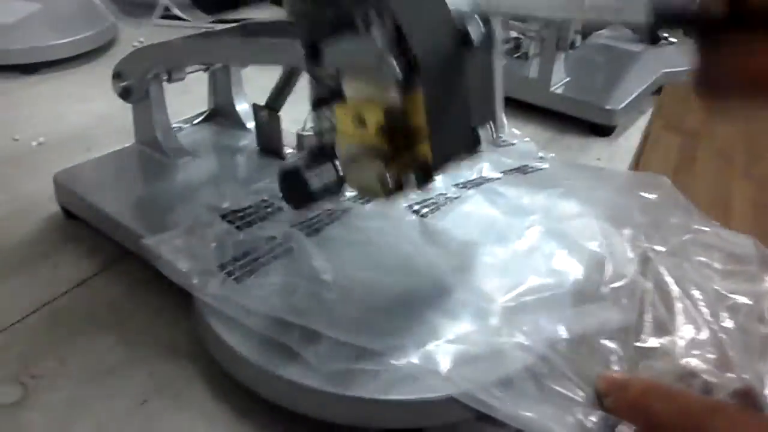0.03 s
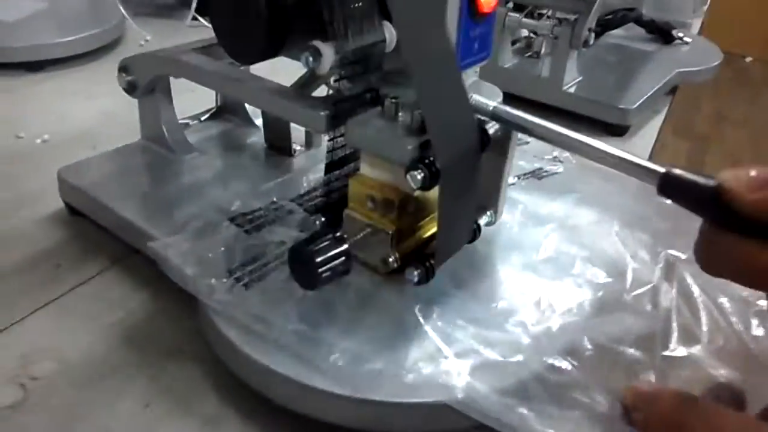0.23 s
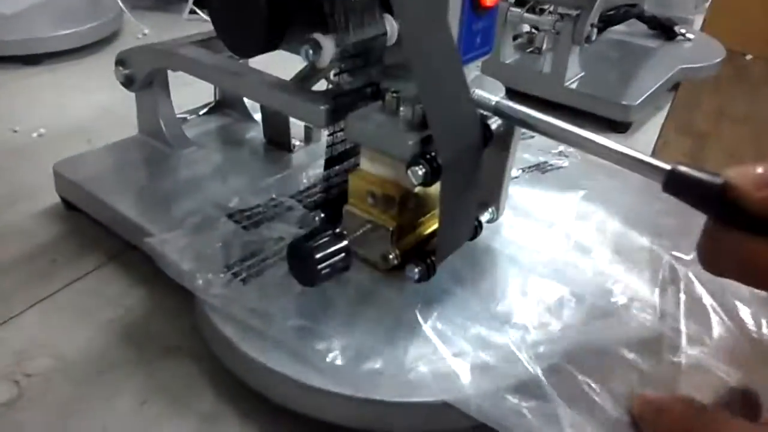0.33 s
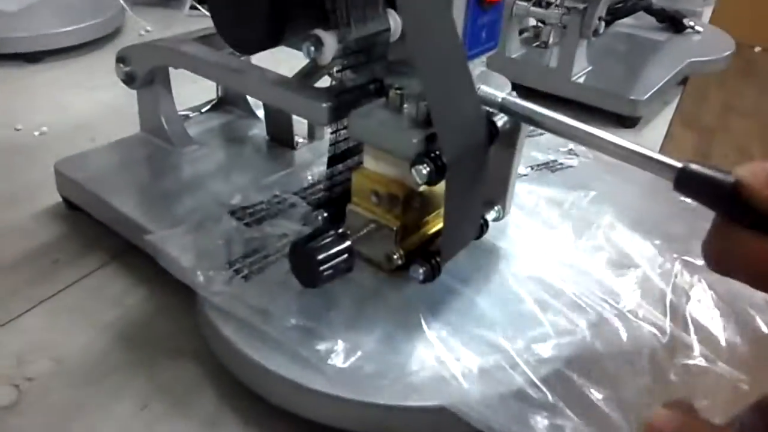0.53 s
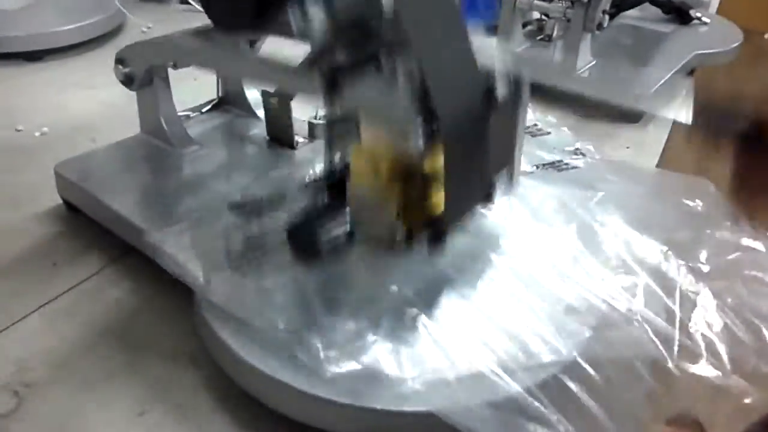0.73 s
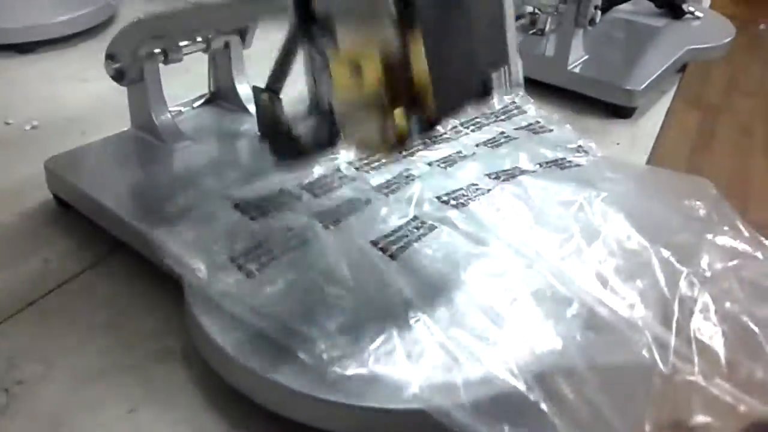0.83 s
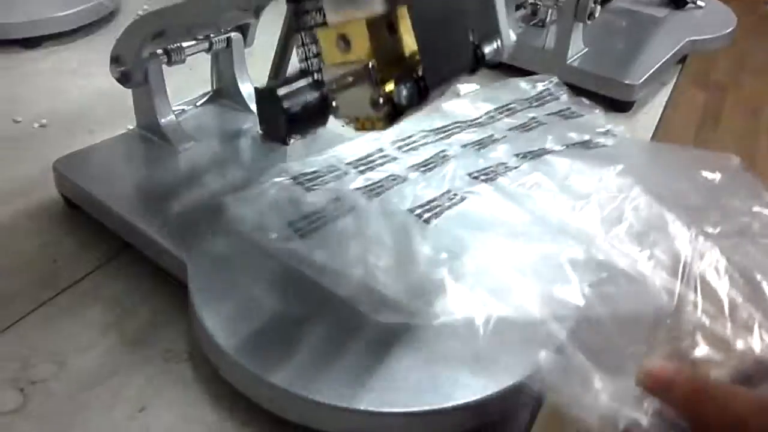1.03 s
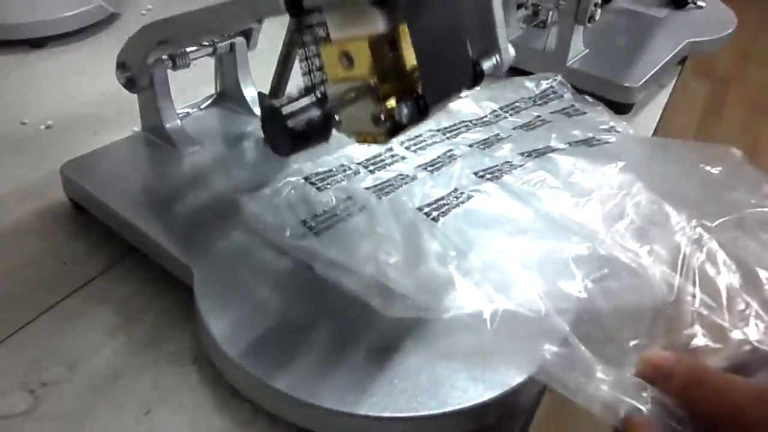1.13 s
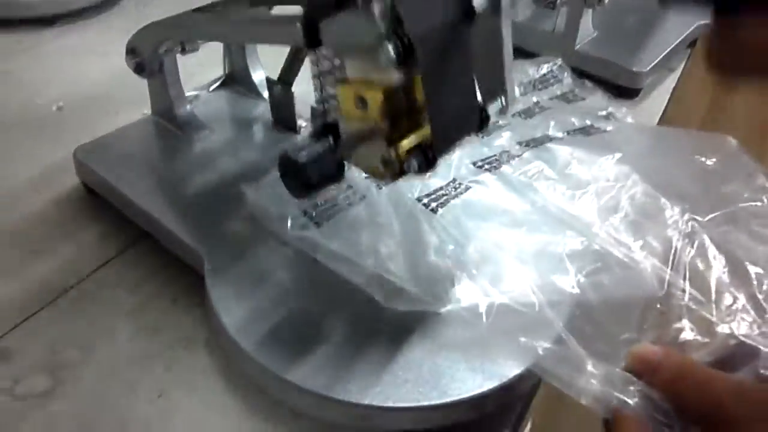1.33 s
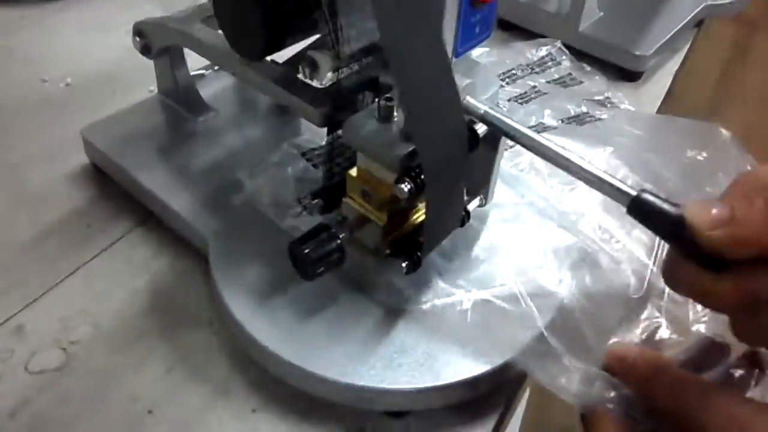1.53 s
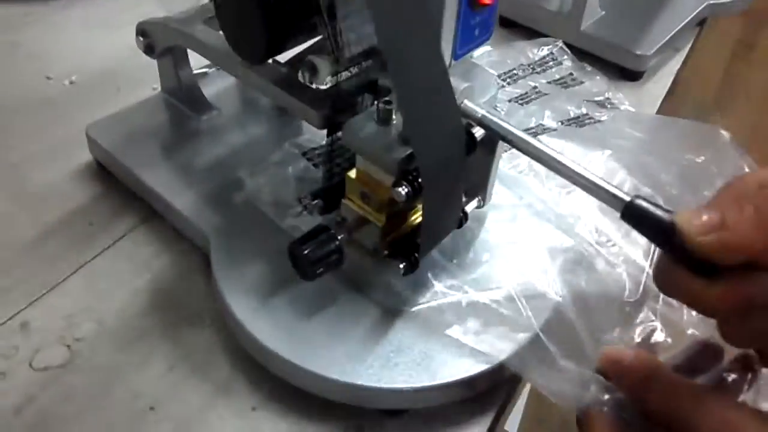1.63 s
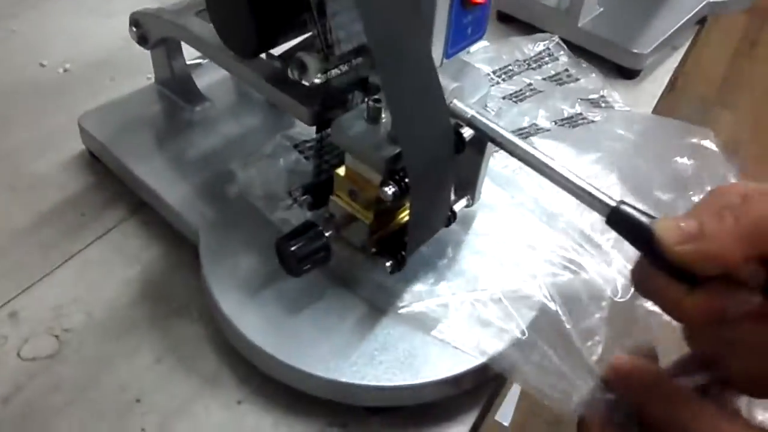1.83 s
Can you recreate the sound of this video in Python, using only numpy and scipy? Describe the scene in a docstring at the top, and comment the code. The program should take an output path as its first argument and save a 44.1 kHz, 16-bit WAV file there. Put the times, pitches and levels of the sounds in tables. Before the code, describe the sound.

A hand-lever stamping machine clunks onto a plastic bag at about 0.2 seconds, its metal head bouncing and shaking the bench. The bag crackles as it is pulled along, most at 0.8 seconds, when the arm bumps its stop and squeaks faintly. The ribbon feed clicks sharply at 1.2 seconds. A second clunk comes at 1.6, followed by light crinkles. Everything is close, with short workshop echo and faint hum.

```python
"""A hand-lever coding machine stamps a plastic bag twice, close by on a workshop bench.
Its metal head clunks onto a plate, bounces and shakes the bench. Between the strokes the bag
is pulled along and crackles as its creases flip, the rising arm bumps its stop and squeaks
faintly, and the ribbon feed clicks over. The room adds a short echo and a faint hum."""
import sys
import numpy as np
from scipy import signal
from scipy.io import wavfile

SR = 44100
rng = np.random.default_rng(int(sys.argv[2]) if len(sys.argv) > 2 else 0)


def materialize(psi):
    """Save the field psi as 16-bit PCM at rate SR to the path in sys.argv[1].

    A 1-D psi becomes a single channel; in a 2-D psi each row is a channel.
    """
    bounded = np.clip(np.atleast_2d(psi).T, -1, 1)
    quanta = np.round(bounded * 32767).astype(np.int16)
    wavfile.write(sys.argv[1], SR, quanta)


N = 83790
T = np.arange(N) / SR

# Steady workshop noise: band_hz, level_db
BACKGROUND = [(25, -72), (55, -73), (95, -71), (170, -72), (260, -74.5), (450, -73), (1000, -75.5),
              (2400, -74.5), (5000, -81.5), (10000, -78.5), (15000, -81.5)]
# Hum of mains power and a motor: pitch_hz, level_db
HUM = [(98, -68.5), (252, -71.5)]
# How hard the bag is being moved: time_s, level_db
BAG_MOVEMENT = [(0, -27.5), (.15, -25.5), (.205, -2.5), (.26, -28), (.40, -22.5), (.52, -29.5),
                (.79, -25.5), (.832, -3), (.865, -16.5), (.95, -21), (1.08, -21), (1.17, -31), (1.53, -37),
                (1.595, -8), (1.66, -32), (1.9, -26)]
# Hiss of sliding plastic: band_hz, level_db
BAG_HISS = [(300, -62), (900, -59), (2300, -58.5), (3500, -59), (5200, -49), (9500, -63.5), (15000, -75)]
# Single creases snapping: start_s, level_db, brightness_hz
CREASE_SNAPS = [(.1775, 2, 2930), (0.2013, -5, 7000), (0.3335, -9, 15900), (0.3783, -9, 9700),
                (0.399, -8.5, 13000), (0.4044, -16, 7000), (0.437, -11, 13600), (.4590, -23, 9190),
                (0.491, -9.5, 7000), (.5497, -13.5, 15000), (0.6121, -13, 9050), (0.6433, -15, 13800),
                (0.6978, -4.5, 3970), (0.761, -3.5, 10240), (0.7649, -7, 10000), (0.7691, 1.5, 11300),
                (0.7997, -22, 12900), (0.817, -8, 7860), (0.8221, 2, 6500), (0.8288, 1, 5500),
                (0.832, 3.5, 9300), (1.7194, -17, 8900), (1.8099, -4.5, 16000), (1.8300, -11.5, 10010),
                (1.8718, -19, 12900), (1.8972, -5, 14300)]
# Brief ring of the plastic: band_hz, level_db, fade_s (always the time to fall by 60 dB)
BAG_RING = [(1000, -57.5, 0.004), (2350, -44, 0.0096), (3820, -58, 0.003), (5940, -42, 0.0086),
            (9720, -46, 0.0033), (15450, -24, .0035)]
# Hits and bounces of the head: start_s, metal_db, brightness_hz, thump_db, plate_db
HEAD_HITS = [(0.2122, -7.5, 6000, -2.5, -1), (0.2135, -3, 8900, -10, -23), (0.2155, -0.5, 7900, -26, -13),
             (0.2305, -6, 9200, -11.5, -32), (0.2824, -10.5, 1760, -9.5, -18.5),
             (0.3072, -30, 495, -28, -48), (0.342, -26, 500, -25, -50), (0.3780, -37, 900, -49, -43),
             (0.536, -22.5, 610, -26.5, -44), (0.565, -30, 407, -34, -41), (1.6002, -28, 1540, -11, -13),
             (1.6022, -8, 6840, -5.5, -29), (1.61, -10.5, 2270, -14, -15.5), (1.6219, -19, 7500, -9.5, -20),
             (1.6294, -14.5, 9300, -18, -25), (1.7020, -24, 500, -27, -33)]
# Tones of the cast metal frame: pitch_hz, level_db, fade_s
FRAME_TONES = [(416.8, -36, 0.08), (542.9, -33.5, 0.19), (636.3, -48, 0.14), (674.6, -20, 0.033),
               (910, -36, 0.16), (950, -37, 0.092), (1476, -34, 0.063), (2250, -68.5, 0.037),
               (2800, -39, 0.1), (4890, -39.5, 0.077), (6223, -30, 0.041)]
# The many small rings of head, bolts and arm: band_hz, level_db, fade_s
CLATTER = [(268, -32, 0.36), (490, -32.5, 0.049), (855, -33, 0.015), (1180, -33, 0.057), (2100, -28, 0.075),
           (3450, -32.5, 0.064), (5700, -25, 0.034), (8300, -32, 0.013), (12000, -38, 0.012),
           (14800, -2.5, 0.06)]
# Tones of the bench top and base plate: pitch_hz, level_db, fade_s
BENCH_TONES = [(49.4, -38, 0.302), (72.13, -24.5, 0.3), (93.26, -30.5, 0.37), (122.3, -27, 0.29),
               (152.2, -31, 0.22), (189.7, -34, 0.27), (241, -25, 0.14), (254, -25, 0.12), (296, -27, 0.31),
               (355, -32, 0.19)]
# The whole machine rocking on its feet: pitch_hz, level_db, fade_s
FEET_TONES = [(67, -18, 0.083), (110, -17, 0.051)]
# Hollow tones of the stamping plate: pitch_hz, level_db, fade_s
PLATE_TONES = [(886, -16.5, 0.052), (973, -24, 0.063), (756, -19, 0.036), (1676, -25.5, 0.056)]
# The rising arm meeting its soft stop: start_s, level_db, brightness_hz
ARM_BUMPS = [(.8365, 1.5, 910), (.8485, 0, 700)]
# Low tones of the arm: pitch_hz, level_db, fade_s
ARM_TONES = [(160, -56.5, 0.08), (247.5, -47, 0.11)]
# Squeaks of the arm's pivot: start_s, length_s, level_db
SQUEAKS = [(0.864, 0.056, -55.5), (.921, 0.028, -49.5)]
# Clicks of the ribbon feed: start_s, ring_db, brightness_hz, crack_db, housing_db
FEED_CLICKS = [(1.1922, -19, 2500, -49, -20), (1.1959, -10, 3900, -39, -2), (1.201, 4, 2840, -21, -9),
               (1.2088, -18, 4000, -28, -1.5), (1.2266, -4, 10700, 0.5, 4)]
# Tones of the feed's small catch: pitch_hz, level_db, fade_s
CATCH_TONES = [(2110, -59, 0.036), (2292, -33.5, 0.037), (2435, -43, 0.04), (3500, -34.5, 0.02),
               (3855, -47.5, 0.1), (5170, -28.5, 0.012), (6320, -36.5, 0.028), (8200, -33.5, 0.016),
               (10940, -46, 0.027), (11400, -37, 0.023), (13770, -49, .02)]
# Sharp crack of the catch: band_hz, level_db, fade_s
CATCH_CRACK = [(990, -61, .03), (3060, -56, 0.028), (6480, -36, 0.011), (9500, -61, 0.01),
               (13230, -30.5, 0.02), (16000, -43, 0.018)]
# Loose parts of the feed: band_hz, level_db, fade_s
FEED_RATTLE = [(1540, -59, 0.12), (2930, -41, 0.083), (5500, -53, 0.055), (9000, -57, 0.074),
               (12000, -49, 0.15)]
# Tones of the housing around the feed: pitch_hz, level_db, fade_s
HOUSING_TONES = [(179, -56, 0.081), (255, -53, 0.15), (440, -61.5, 0.35), (958, -39.5, 0.063),
                 (1420, -58, 0.057)]
# Echo of the workshop: band_hz, level_db, fade_s
ROOM_ECHO = [(61, -14.5, 0.96), (130, -25.5, .5), (258, -29, 0.76), (570, -10, 0.27), (955, -10.5, 0.27),
             (2550, -12, 0.34), (6100, -21.5, 0.14), (15000, -14.5, 0.13)]

TOP_HZ = 15900  # upper limit of the sound, also the brightness of a hard tap
BAND_EDGES_HZ = 22 * 2 ** (np.arange(20) / 2)


def from_db(db):
    """Turn decibels into a number to multiply by."""
    return 10 ** (np.asarray(db) / 20)


def at_hz(table, hz):
    """Read a table's values at one frequency, blending between rows."""
    row_hz, *columns = np.transpose(table)
    return [np.interp(np.log(hz), np.log(row_hz), column) for column in columns]


def fade_out(fade_s, size=N):
    """A curve that falls by 60 dB every fade_s seconds."""
    return np.exp(-np.log(1000) * T[:size] / max(fade_s, 1e-3))


def noise_bands(size=N):
    """Give equally strong half-octave bands of noise, each with its middle frequency."""
    for low, high in zip(BAND_EDGES_HZ, BAND_EDGES_HZ[1:]):
        band_filter = signal.butter(2, [low, high], "band", fs=SR, output="sos")
        band = signal.sosfilt(band_filter, rng.standard_normal(size + SR // 10))[-size:]
        yield np.sqrt(low * high), band / band.std()


def steady_noise(table):
    """Noise with its own level in each band."""
    return sum(from_db(at_hz(table, hz)[0]) * band for hz, band in noise_bands())


def noisy_ring(table, size=6000):
    """Many overlapping tones blur into noise; each band dies away at its own speed."""
    ring = np.zeros(N)
    for hz, band in noise_bands(size):
        db, fade_s = at_hz(table, hz)
        fade = fade_out(fade_s, size)
        bass_cut = min(1, hz / table[0][0]) ** 2
        even_energy = np.sqrt(np.sum(fade ** 2) / np.sum((band * fade) ** 2))
        ring[:size] += from_db(db) * bass_cut * band * fade * even_energy
    return ring


def clear_ring(tones, wave=np.sin):
    """A struck object rings with fading tones; np.cos suits a sudden push on a broad surface."""
    return sum(from_db(db) * wave(2 * np.pi * hz * T) * fade_out(fade_s) * (-1) ** (k // 2)
               for k, (hz, db, fade_s) in enumerate(tones))


def taps(rows):
    """Short pushes from (start_s, level_db, brightness_hz); a softer tap has less treble."""
    force = np.zeros(N)
    for start_s, db, hz in rows:
        soften = signal.butter(2, min(hz, .45 * SR), fs=SR)
        pulse = signal.lfilter(*soften, signal.unit_impulse(SR // 20))
        start = min(int(start_s * SR), N - 1)
        force[start:start + len(pulse)] += from_db(db) * pulse[:N - start]
    return force


def excite(force, ring):
    """Every push in the force starts its own copy of the ring."""
    return signal.fftconvolve(force, ring)[:N]


def workshop_background():
    """Mains power and a motor hum faintly over steady noise."""
    hum = sum(from_db(db) * np.sin(2 * np.pi * (hz * T + rng.random())) for hz, db in HUM)
    return hum + steady_noise(BACKGROUND)


def bag(crinkles_per_s=1300, crinkle_db=-16.5, spread_db=3):
    """Tiny crinkles and a sliding hiss grow as the bag is moved harder; single creases snap on top."""
    movement = from_db(np.interp(T, *np.transpose(BAG_MOVEMENT)))
    sizes = from_db(crinkle_db + spread_db * np.minimum(rng.exponential(1, N), 4))
    signs = rng.choice([-1, 1], N)
    crinkles = sizes * signs * movement * (rng.random(N) < crinkles_per_s / SR)
    snaps = sum(crease_snap(*row) for row in CREASE_SNAPS)
    return snaps + excite(crinkles, noisy_ring(BAG_RING)) + movement * steady_noise(BAG_HISS)


def crease_snap(start_s, db, brightness_hz):
    """One crease flips and rings the plastic; a higher snap stands for a smaller crease."""
    lowest_hz = np.clip(0.38 * brightness_hz, 100, .4 * SR)
    bass_cut = signal.butter(2, lowest_hz, "high", fs=SR)
    force = signal.lfilter(*bass_cut, taps([(start_s, db, brightness_hz)]) + 1e-18)
    return excite(force, noisy_ring(BAG_RING))


def stamp(spread_db=3, thump_hz=556):
    """Each hit of the head rings the frame and small parts a little differently, and thumps the bench."""
    metal = 0
    for start_s, db, brightness_hz, _, _ in HEAD_HITS:
        tones = [(hz, level + spread_db * rng.normal(), fade_s) for hz, level, fade_s in FRAME_TONES]
        ring = clear_ring(tones) + noisy_ring(CLATTER)
        metal = metal + excite(taps([(start_s, db, brightness_hz)]), ring)
    push = taps([(start_s, db, thump_hz) for start_s, _, _, db, _ in HEAD_HITS])
    bench = clear_ring(BENCH_TONES, np.cos) + clear_ring(FEET_TONES, np.cos)
    return metal + excite(push, bench)


def plate_knock():
    """The head's stamping face knocks on the plate, which rings hollowly."""
    force = taps([(start_s, db, TOP_HZ) for start_s, _, _, _, db in HEAD_HITS])
    return excite(force, clear_ring(PLATE_TONES))


def arm_bump():
    """The arm bumps dully at the top of its swing."""
    return excite(taps(ARM_BUMPS), clear_ring(ARM_TONES))


def pivot_squeak(pitch_hz=3960, width_hz=30, rise_s=0.0023):
    """Rubbing at the pivot makes the arm sing on one slightly wavering note."""
    narrow_filter = signal.iirpeak(pitch_hz, pitch_hz / width_hz, fs=SR)
    narrow_noise = signal.lfilter(*narrow_filter, rng.standard_normal(N))
    tone = np.cos(np.angle(signal.hilbert(narrow_noise)))  # keep the waver, even out the loudness
    loudness = 0
    for start_s, length_s, db in SQUEAKS:
        times_s = start_s + np.array([0, rise_s, length_s / 2, length_s])
        loudness = loudness + from_db(db) * np.interp(T, times_s, [0, 1, 0.4, 0.015])
    return tone * loudness


def ribbon_feed():
    """A small catch slips, knocks and snaps home, shaking loose parts and the housing."""
    catch = clear_ring(CATCH_TONES)
    ring = sum(excite(taps([row[:3]]), catch + noisy_ring(FEED_RATTLE)) for row in FEED_CLICKS)
    cracks = taps([(start_s, db, TOP_HZ) for start_s, _, _, db, _ in FEED_CLICKS])
    knocks = taps([(start_s, db, TOP_HZ) for start_s, _, _, _, db in FEED_CLICKS])
    return ring + excite(cracks, noisy_ring(CATCH_CRACK)) + excite(knocks, clear_ring(HOUSING_TONES))


def room_echo(sound, delay_s=0.015):
    """Sound bounces around the workshop; the highest notes die away soonest."""
    fade_in = np.clip(T / delay_s - 1, 0, 1)  # silent until delay_s, then rising
    echo = 0
    for hz, band in noise_bands():
        db, fade_s = at_hz(ROOM_ECHO, hz)
        tail = band * fade_out(fade_s) * fade_in
        band_share = hz / np.sqrt(2) / SR  # wider bands hold more energy
        echo = echo + from_db(db) * tail * np.sqrt(band_share / np.sum(tail ** 2))
    return excite(sound, echo)


def scene():
    """The machine and the bag with their echo, over the workshop's background."""
    # Each sound comes with the level_db it sends into the room.
    # The plate knock, feed clicks, squeak and arm bump sound drier, with less room echo.
    sources = [(stamp(), -2), (plate_knock(), -6),
               (ribbon_feed() + pivot_squeak() + arm_bump(), -10), (bag(), 0.5)]
    direct = sum(sound for sound, _ in sources)
    echo = room_echo(sum(from_db(db) * sound for sound, db in sources))
    return (direct + echo + workshop_background())[None]


def record(dry):
    """Cut the treble steeply above TOP_HZ."""
    return signal.sosfilt(signal.ellip(10, .2, 80, TOP_HZ, fs=SR, output="sos"), dry)


dry = scene()
out = record(dry)
materialize(out)
```